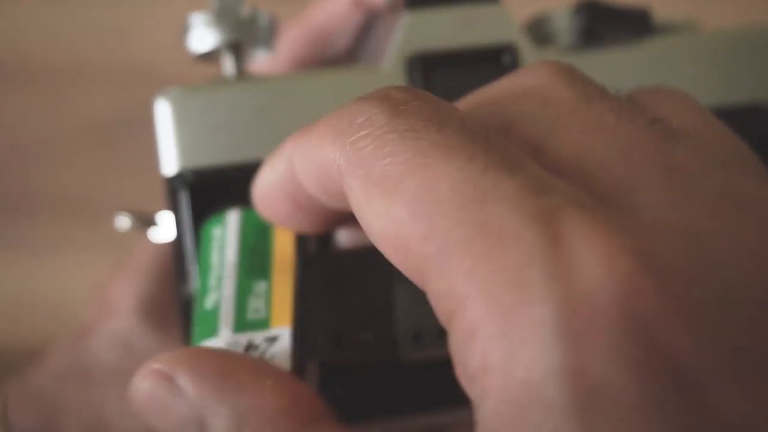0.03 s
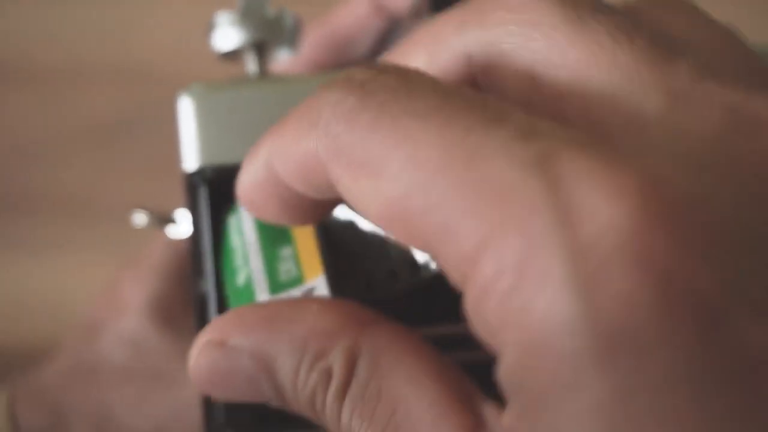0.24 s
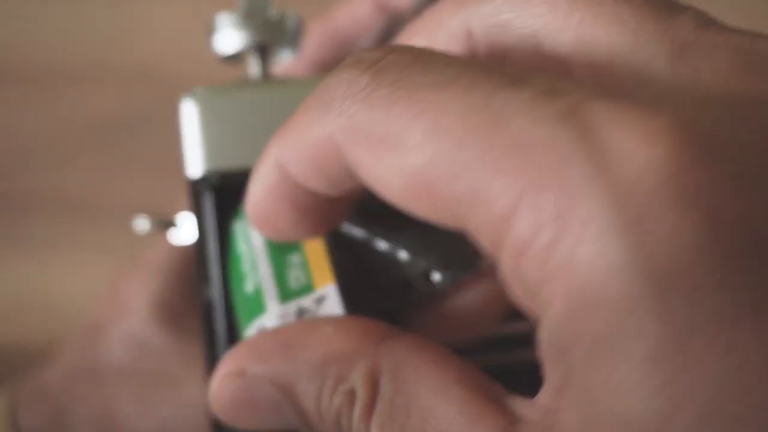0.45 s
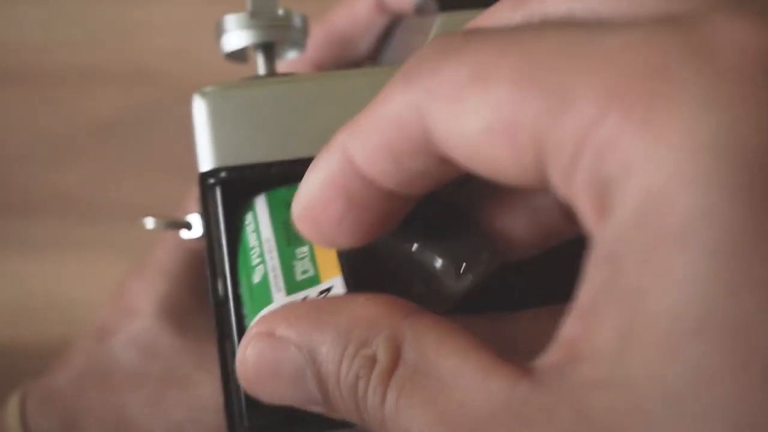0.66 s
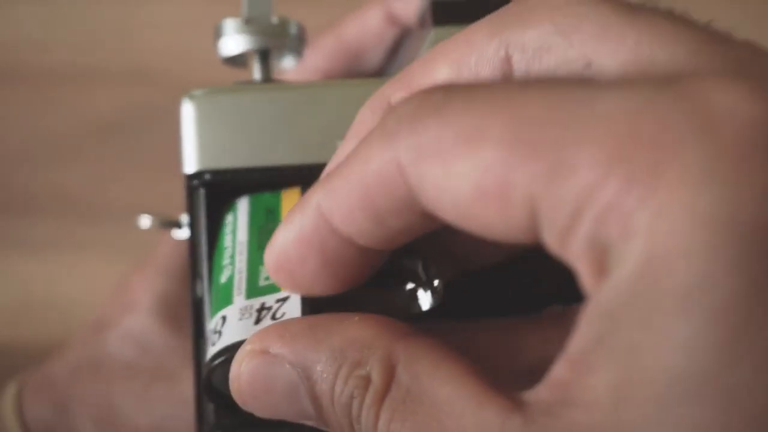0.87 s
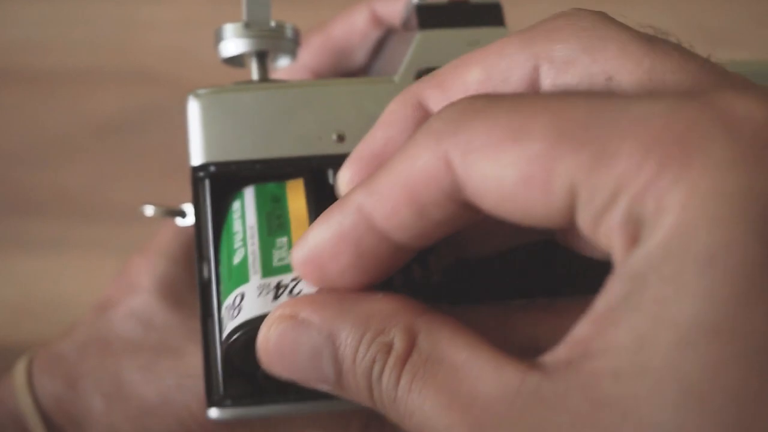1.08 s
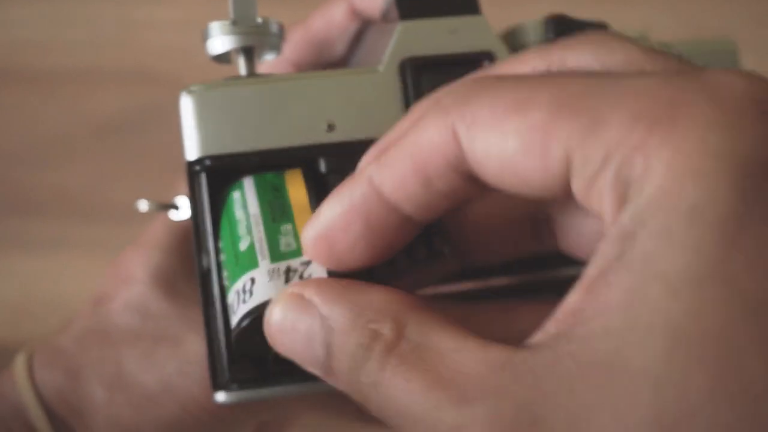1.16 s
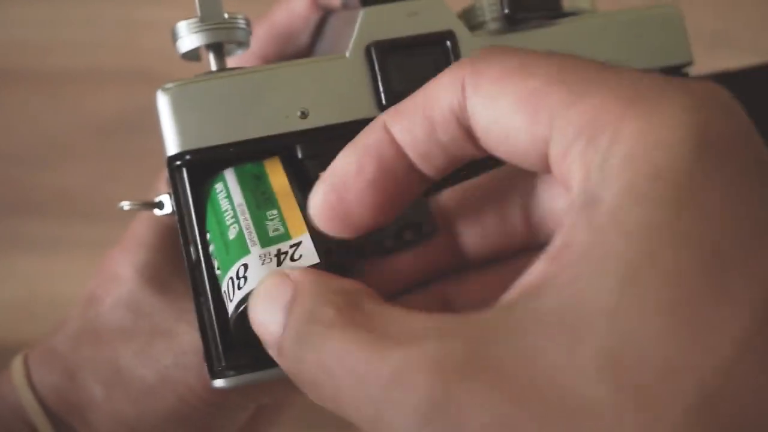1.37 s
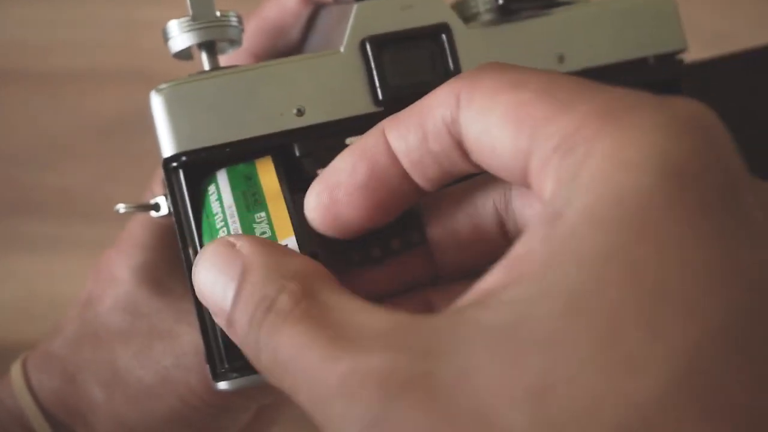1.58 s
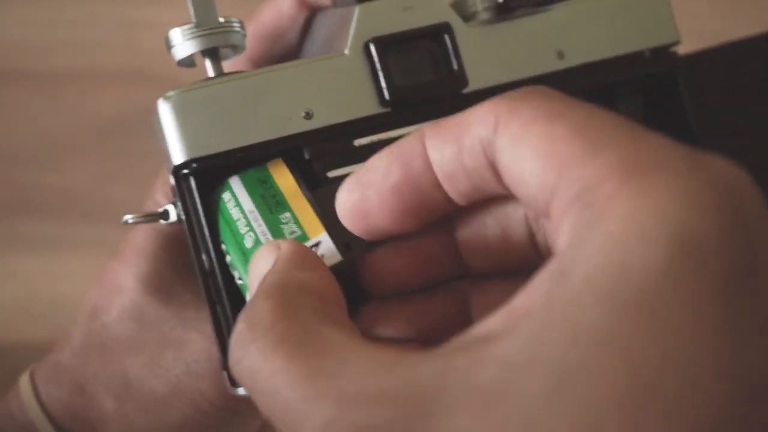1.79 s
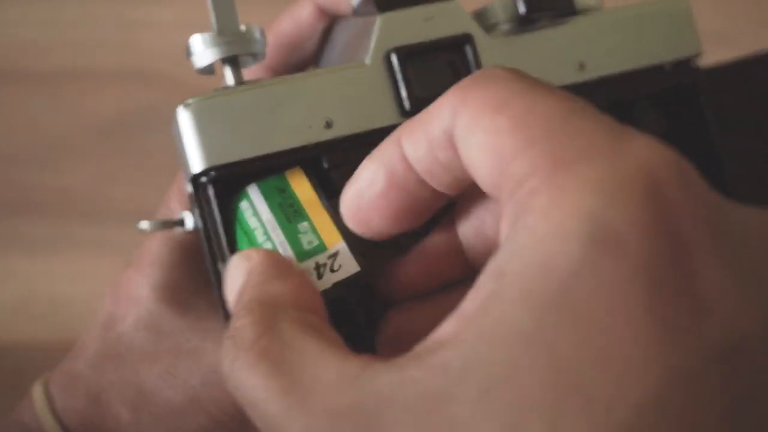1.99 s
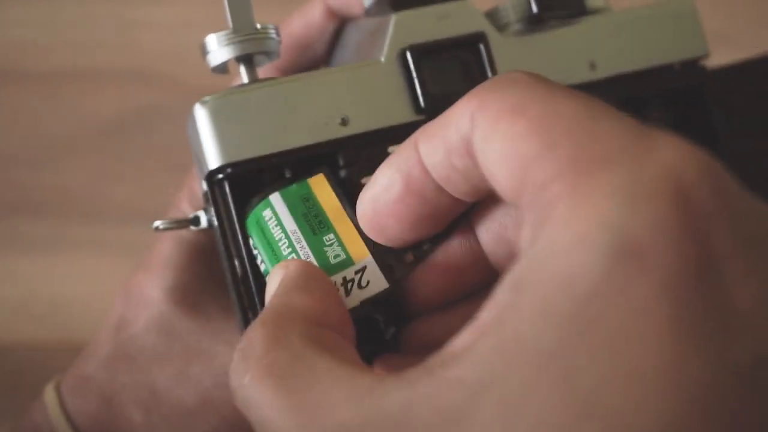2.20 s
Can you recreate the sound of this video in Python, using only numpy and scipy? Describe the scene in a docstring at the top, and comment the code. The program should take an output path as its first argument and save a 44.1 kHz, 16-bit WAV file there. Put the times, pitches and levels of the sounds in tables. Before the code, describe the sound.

Sharp little clicks as fingers press a film canister into a camera.

```python
"""A quiet room, close up: fingers press a film canister into the chamber of a camera.
Each contact rings the small body for a few milliseconds and gives a bright tick; the canister rattles
into its seat. Between the clicks, fingertips catch and slip on canister and body.
The table scatters the clicks; the room answers clicks and slides, over a steady hiss."""
import sys
import numpy as np
from scipy import signal
from scipy.fft import rfft, irfft, next_fast_len
from scipy.io import wavfile
from scipy.ndimage import map_coordinates

SR = 44100
rng = np.random.default_rng(int(sys.argv[2]) if len(sys.argv) > 2 else 0)


def inscribe(sig):
    """Save sig as 16-bit PCM at rate SR to the path in sys.argv[1].

    A 1-D sig is mono; a 2-D sig holds one channel per row.
    Samples are clipped to [-1, 1] before scaling.
    """
    pcm = np.round(np.clip(np.atleast_2d(sig).T, -1, 1) * 32767)
    wavfile.write(sys.argv[1], SR, pcm.astype(np.int16))


N = 99225


def amp(db):
    """Decibels to gain."""
    return 10 ** (np.asarray(db) / 20)


def unit_rms(x):
    """Scale to rms 1."""
    return x / np.sqrt(np.mean(x ** 2) + 1e-20)


def curve_at(points, hz):
    """Interpolate (freq_hz, value) points on a log frequency axis."""
    freqs, values = np.transpose(points)
    return np.interp(np.log(hz + 1), np.log(freqs + 1), values)


def pan(db):
    """Stereo gains, left over right by db."""
    return amp(np.array([[db], [-db]]) / 2)


def wobble(rate_hz):
    """Smooth random curve."""
    return map_coordinates(rng.standard_normal(N), [np.arange(N) * rate_hz / SR])


def noise(colour_db, coherence, size):
    """Stereo noise of rms 1, with spectrum colour_db(hz) and a left-right coherence curve."""
    hz = np.fft.rfftfreq(size, 1 / SR)
    angle = np.arccos(np.clip(curve_at(coherence, hz), -1, 1)) / 2
    spectrum = rfft(rng.standard_normal((2, size))) * amp(colour_db(hz))
    mid, side = irfft(spectrum * [np.cos(angle), np.sin(angle)], size)
    return unit_rms(np.array([mid + side, mid - side]))


def add(track, start_s, sound):
    """Mix a sound into a track."""
    part = track[:, max(round(start_s * SR), 0):][:, :sound.shape[1]]
    part += sound[:, :part.shape[1]]


def fade(t, t60_s, attack_s=0.0005, damping=1):
    """Quick rise, then a decay: exponential at damping 1, steepening above it."""
    return np.exp(-np.log(1000) * (t / t60_s) ** damping) * (1 - np.exp(-t / attack_s))


# freq_hz, gain_db
HISS_SPECTRUM = [(25, -20), (100, -15), (200, -8.5), (380, -2.5), (800, -0.5), (1100, 0.5), (1500, -4),
                 (2100, -1.5), (3000, -3.5), (7000, -7), (13000, -4), (16000, -7)]
# freq_hz, coherence
HISS_COHERENCE = [(50, 1), (500, 0.067), (2200, 0.1), (9000, 0.083), (14000, 0.27)]
HISS_DB, WHINE_DB, WHINE_HZ, WHINE_WIDTH_HZ = -56, -73.5, 12800, 60


def hiss():
    """Steady hiss with a faint, narrow whine."""
    peak_db = lambda hz: -20 * np.log10(1 + ((hz - WHINE_HZ) / WHINE_WIDTH_HZ) ** 2)
    whine = noise(peak_db, HISS_COHERENCE, N)
    broadband = noise(lambda hz: curve_at(HISS_SPECTRUM, hz), HISS_COHERENCE, N)
    return amp(HISS_DB) * broadband * pan(db=0.5) + amp(WHINE_DB) * whine


# freq_hz, t60_s
ROOM_DECAY = [(300, 0.19), (2200, 0.76), (6000, 0.93), (14000, 0.59)]
# freq_hz, gain_db
ROOM_SPECTRUM = [(300, -15), (900, 7), (1300, 7.5), (1750, 6), (2000, 0), (2140, -1), (2300, -2.5),
                 (2550, -0.5), (3100, 4), (4000, 1), (10000, 3), (13000, 1), (15000, -1)]
# freq_hz, coherence
ROOM_COHERENCE = [(300, 0.7), (2200, 0.27), (4500, 0.41), (14000, 0)]
ROOM_DB, WALL_DB, WALL_DELAY_S = -15, 2.5, 0.031


def room(sound):
    """Diffuse room tail, lifted when the nearest wall's echo arrives."""
    white = noise(np.zeros_like, ROOM_COHERENCE, SR * 2 // 3)
    hz, t, frames = signal.stft(white, SR, nperseg=256)
    gain_db = curve_at(ROOM_SPECTRUM, hz)[:, None] - 60 * t / curve_at(ROOM_DECAY, hz)[:, None]
    wall = amp(WALL_DB) * fade(np.maximum(t - WALL_DELAY_S, 0), t60_s=0.14)
    tail = signal.istft(frames * amp(gain_db) * np.hypot(1, wall), SR, nperseg=256)[1]
    return amp(ROOM_DB) * signal.fftconvolve(sound, tail / np.linalg.norm(tail[0]), axes=1)


# freq_hz, coherence
SCATTER_COHERENCE = [(500, 1), (2200, 0.62), (5000, 0.304), (14000, 0.182)]
SCATTER_DB = -17


def tabletop(sound):
    """Early scatter from the hands and the table."""
    t = np.arange(SR // 20) / SR
    scatter = noise(np.zeros_like, SCATTER_COHERENCE, len(t)) * fade(t, t60_s=0.06)
    return amp(SCATTER_DB) * signal.fftconvolve(sound, scatter / np.linalg.norm(scatter[0]), axes=1)


# freq_hz, gain_db
SKIN_SPECTRUM = [(200, -25), (800, -8), (2200, -14.5), (3500, 3), (6500, -2), (9000, -0.5), (13000, 0),
                 (16000, -3)]
# freq_hz, gain_db
BODY_SPECTRUM = [(200, -39.5), (550, -32.5), (820, -13), (1080, -12), (1350, -10.5), (1700, -9.5),
                 (2150, 6), (2600, -7.5), (3100, -12.5), (3400, -23), (3750, -11), (4300, -22), (6000, -28),
                 (15000, -28.5)]
# freq_hz, gain_db
SQUEAK_SPECTRUM = [(200, -49), (3000, -16), (5000, -10.5), (6200, 4.5), (7600, -7), (9000, -11.5),
                   (10500, -2), (13000, 2), (16000, -2)]
# freq_hz, coherence
NEAR_COHERENCE = [(500, 0.37), (2200, 0.43), (4500, 0.43), (9000, 0.76), (14000, 0.7)]
# start_s, length_s, skin_db, body_db, squeak_db
FINGER_SLIDES = [ (-0.01, 0.051, -54.5, -45, -55.5), (0.128, 0.029, -60, -55, -74),
                 (0.185, 0.087, -56.5, -54, -73), (0.467, 0.02, -40.5, -44, -45),
                 (0.496, 0.018, -49, -57.5, -46), (0.677, 0.014, -53, -68, -53),
                 (0.7, 0.015, -53, -77, -45.5), (0.73, 0.0039, -46.5, -78, -45.5),
                 (1.004, .010, -55.5, -86, -59), (1.228, 0.0096, -66, -69, -70),
                 (1.278, 0.034, -57, -80, -47.5), (1.391, 0.098, -58, -68, -80),
                 (1.725, 0.094, -61.5, -59.5, -80), (2.099, 0.0195, -53.5, -63, -76),
                 (2.126, 0.047, -60, -68, -83), (2.218, .050, -54, -47, -74)]
SLIDE_RISE_S, SLIDE_T60_S, SLIDE_ROUGH_DB = 0.0044, 0.065, 0.5


def fingers():
    """Skin catches and slips on the canister: rough hiss, a scrape through the body, a dry squeak."""
    t = np.arange(N) / SR
    envelopes = np.zeros((3, N))
    for start_s, length_s, *layer_db in FINGER_SLIDES:
        rise = np.clip((t - start_s) / SLIDE_RISE_S, 0, 1)
        fall = np.exp(-np.log(1000) * np.maximum(t - start_s - length_s, 0) / SLIDE_T60_S)
        envelopes += amp(layer_db)[:, None] * rise * fall
    grip = unit_rms(amp(SLIDE_ROUGH_DB * wobble(rate_hz=700) + 1.5 * wobble(rate_hz=90)))
    friction = np.zeros((2, N))
    for envelope, spectrum in zip(envelopes, (SKIN_SPECTRUM, BODY_SPECTRUM, SQUEAK_SPECTRUM)):
        friction += grip * envelope * noise(lambda hz: curve_at(spectrum, hz), NEAR_COHERENCE, N)
    return friction * pan(db=2) + room(friction)[:, :N]


def mode(t, pitch_hz, t60_s):
    """One resonance, choked ever faster by the gripping fingers."""
    return np.sin(2 * np.pi * pitch_hz * t) * fade(t, t60_s, damping=1.266)


# pitch_ratio, gain_db, t60_s
BODY_MODES = [(.79, -17, 0.011), (1.11, -21.5, 0.0063), (1.23, -12, 0.01), (1.44, -12.5, 0.012),
              (1.68, -24, 0.019)]
CHATTER_DB = -11.5


def body_ring(t, pitch_hz, t60_s, overtone_db):
    """The struck body: its main mode, its other modes and the chatter of loose parts."""
    overtones = sum((-1) ** (k + 1) * amp(gain_db) * mode(t, pitch_hz * ratio, mode_t60_s)
                    for k, (ratio, gain_db, mode_t60_s) in enumerate(BODY_MODES))
    chatter = noise(lambda hz: curve_at(BODY_SPECTRUM, hz), NEAR_COHERENCE, len(t))
    chatter *= amp(CHATTER_DB) * fade(t, t60_s=0.028)
    return mode(t, pitch_hz, t60_s) + amp(overtone_db) * (overtones + chatter)


# freq_hz, gain_db
TICK_SPECTRUM = [(200, -54), (600, 4), (1050, -3), (1600, -3), (3800, 3.5), (5200, -0.5), (7300, 2),
                 (8400, -2.5), (9600, 1), (11000, -6.5), (12600, -1.5), (14700, 0.5), (16000, -15.5)]
TICK_BUMP_DB, TICK_WIDTH_OCT = 9, 0.34


def contact_tick(t, centre_hz, t60_s):
    """Bright noise burst of a contact, lifted around centre_hz."""
    def colour_db(hz):
        octaves = np.log2((hz + 1) / centre_hz)
        bump = np.exp(-0.5 * (octaves / TICK_WIDTH_OCT) ** 2)
        return curve_at(TICK_SPECTRUM, hz) + TICK_BUMP_DB * bump
    return noise(colour_db, NEAR_COHERENCE, len(t)) * fade(t, t60_s, attack_s=0.0004)


# start_s, ring_db, pitch_hz, ring_t60_s, overtone_db, knock_db,
# tick_db, tick_hz, tick_t60_s, room_send_db, pan_db
CONTACTS = [ (0.2183, -27.5, 2320, 0.036, -16, -51, -15, 14000, 0.0098, -16, -6),
            (0.2213, -9.5, 2240, 0.0053, -34, -33, -19.5, 9300, 0.016, 5.5, 7.5),
            (0.2370, -28, 2310, .010, -6, -54, -61, 9000, .012, -10.5, -2),
            (0.2887, -4.5, 2415, 0.0098, -4.5, -36, -24.5, 7000, 0.014, 8, 2),
            (0.2975, -10, 2330, .008, -5.5, -64, -26, 9150, 0.0043, -2, 6),
            (0.3055, -17, 2274, 0.0087, -4, -43, -27, 13400, 0.033, 9.5, -12),
            (0.3093, -31, 2210, 0.0071, 14.5, -53, -23, 13200, .007, 1, -20),
            (0.3128, -8.5, 2122, 0.016, 2.5, -90, -14.5, 10650, 0.021, 9.5, 3.5),
            (0.5779, -43.5, 2110, 0.01, -6, -60, -30, 6630, 0.022, 8, 0),
            (0.6106, -14, 2098, 0.0092, -1.5, -38.5, -42, 10400, 0.026, -1, 0.5),
            (0.7731, -46, 2127, 0.047, 16, -44.5, -36, 4630, 0.014, -6.5, 3.5),
            (0.7837, -28, 2174, 0.013, 4, -58, -36, 10800, 0.022, -8, .5),
            (0.8537, -48.5, 2110, .014, -9, -72, -41, 13000, 0.024, 0, 0),
            (0.939, -34.5, 2310, 0.0081, -8, -57.5, -31.5, 12700, 0.04, -10, -1.5),
            (1.1323, -21, 2145, 0.014, 1.5, -46, -50, 12400, 0.014, -1.5, 3),
            (1.1766, -27, 2132, 0.026, 8, -43.5, -37, 5600, 0.019, -1, 2),
            (1.4888, -35, 2376, .012, 10, -44.5, -38.5, 4340, 0.029, 6, 5),
            (1.4946, -16.5, 2134, 0.01, -14, -79, -32, 10000, 0.011, -0.5, -1.5),
            (1.5095, -35, 2090, 0.016, -15, -50, -46.5, 9000, 0.017, -4, -1),
            (1.5763, -42, 2063, 0.025, 8, -51.5, -52, 5000, .018, 5, 0),
            (1.6250, -51, 2240, 0.035, 10.5, -57, -66, 9000, 0.018, -11, -1),
            (1.7049, -55, 2000, 0.021, -10, -58, -37.5, 12500, 0.021, 12.5, 1),
            (1.7747, -38, 2087, 0.0096, 21, -32.5, -25.5, 12100, .012, 0, -0.5),
            (1.7758, -25.5, 2202, .010, 7.5, -29.5, -66, 9600, 0.0054, -11, -1),
            (2.0185, -13.5, 2148, 0.012, -4, -38.5, -31.5, 9600, 0.0092, -1, 2),
            (2.1440, -52, 1760, 0.028, 15, -53, -45, 12100, 0.044, 10, 5),
            (2.2150, -36, 2050, .018, 4, -47.5, -52, 9000, 0.025, 3, 2.5)]
REFLECTION_DELAY_S = 0.0035
LOW_CUT_HZ = 930  # the clicks carry little bass


def canister_clicks():
    """Each contact rings the body, knocks the hollow film chamber and ticks."""
    track = np.zeros((2, N))
    t = np.arange(SR // 15) / SR
    for (start_s, ring_db, pitch_hz, ring_t60_s, overtone_db, knock_db,
         tick_db, tick_hz, tick_t60_s, room_send_db, pan_db) in CONTACTS:
        ring = amp(ring_db) * body_ring(t, pitch_hz, ring_t60_s, overtone_db)
        knock = amp(knock_db) * mode(t, pitch_hz=839, t60_s=0.022)
        tick = amp(tick_db) * contact_tick(t, tick_hz, tick_t60_s)
        click = ring + knock + tick * pan(db=3)
        add(track, start_s, click * pan(pan_db))
        add(track, start_s + REFLECTION_DELAY_S, tabletop(click))
        add(track, start_s + REFLECTION_DELAY_S, amp(room_send_db) * room(click))
    low_cut = signal.butter(2, LOW_CUT_HZ, "highpass", fs=SR, output="sos")
    return signal.sosfilt(low_cut, track)


def scene():
    """Clicks and finger slides over the hiss."""
    return canister_clicks() + fingers() + hiss()


BAND_LIMIT_HZ = 15850


def record(dry):
    """Brick-wall low-pass at the band limit."""
    size = next_fast_len(N + SR // 2)
    passband = np.fft.rfftfreq(size, 1 / SR) < BAND_LIMIT_HZ
    return irfft(rfft(dry, size) * passband, size)[:, :N]


dry = scene()
out = record(dry)
inscribe(out)
```